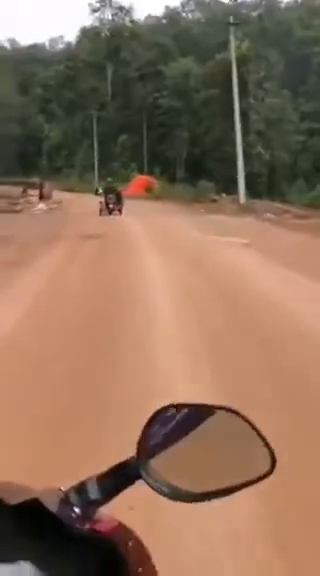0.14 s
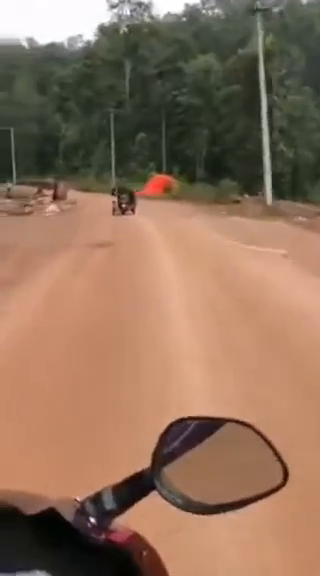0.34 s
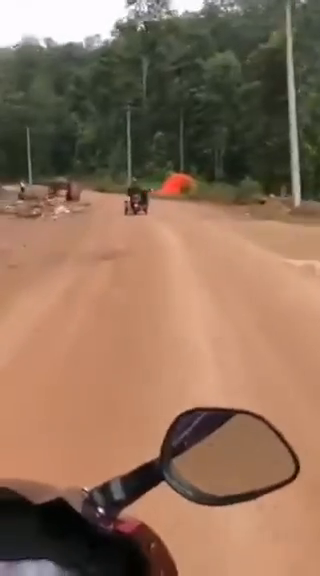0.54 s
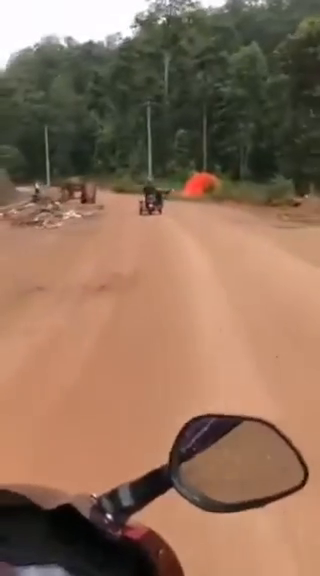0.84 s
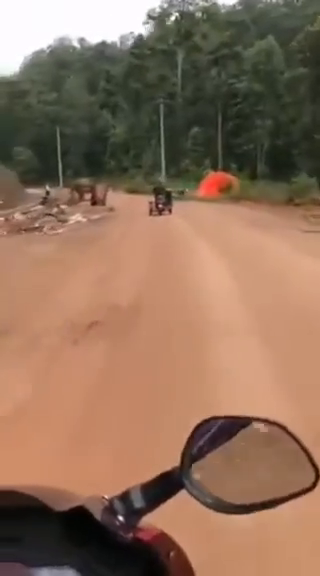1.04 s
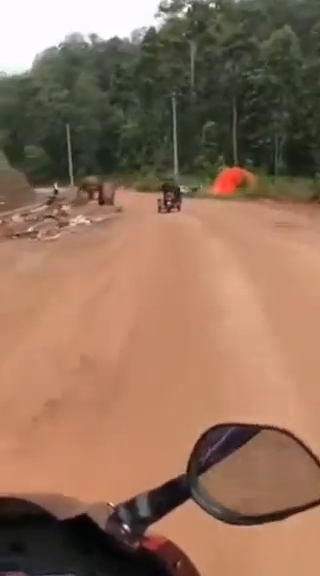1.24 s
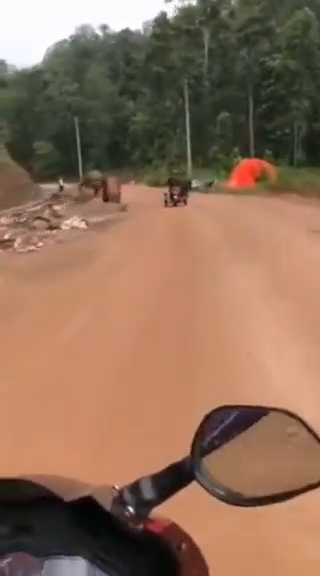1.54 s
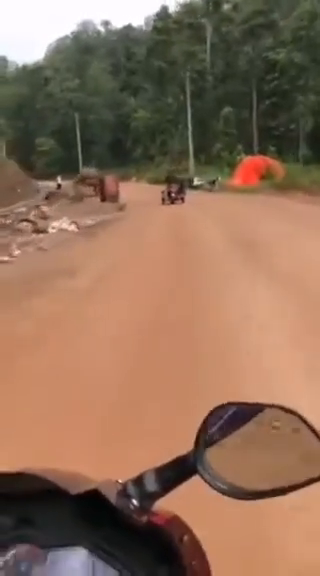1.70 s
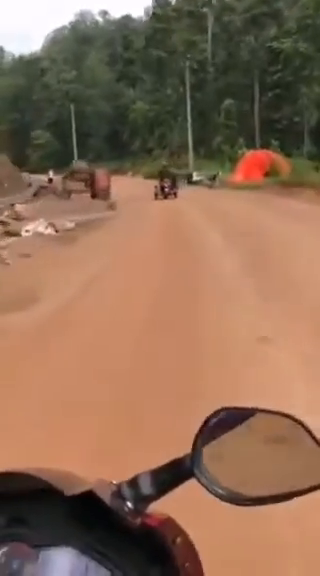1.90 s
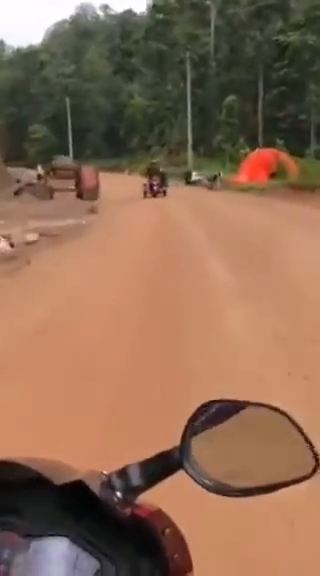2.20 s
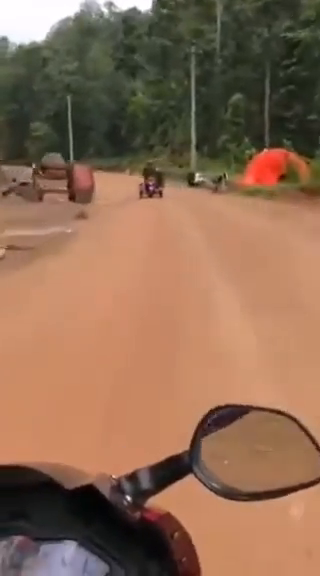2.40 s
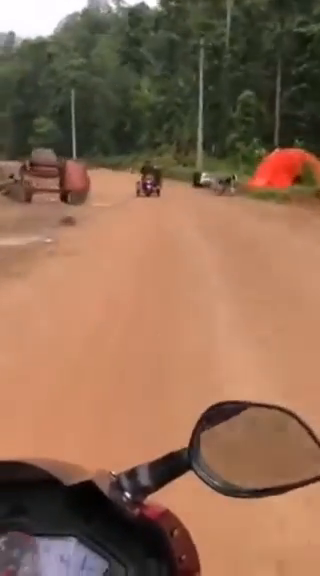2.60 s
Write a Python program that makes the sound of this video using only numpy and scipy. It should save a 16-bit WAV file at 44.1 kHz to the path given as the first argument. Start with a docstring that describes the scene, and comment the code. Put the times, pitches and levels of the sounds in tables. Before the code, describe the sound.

A small single-cylinder motorcycle engine, heard from the seat, pulls with a raspy, clattering putter for the first second. Between about 1.1 and 1.5 seconds it drops to a quieter, slower beat. Tyres hiss on dirt throughout while gusty wind rumbles on the microphone, with dull pops thickest around 1.3 seconds. Faint, thin squeaks come from 1.8 to 2.3 seconds and once more at 2.6.

```python
"""A dirt road, heard from the seat of a small single-cylinder motorcycle.
The engine pulls for a second, then the throttle closes and it drops to a quieter, slower beat;
each firing gives an exhaust puff, a rasp of gas and a clatter of the casing. Tyres hiss on the dirt,
turbulent wind buffets the microphone and single eddies pop on it. Later something squeaks thinly."""
import sys
import numpy as np
from scipy.fft import rfft, irfft, next_fast_len
from scipy.io import wavfile
from scipy.ndimage import map_coordinates

SR = 44100
rng = np.random.default_rng(int(sys.argv[2]) if len(sys.argv) > 2 else 0)


def generate_wav(sig):
    """Save sig (samples, or channels by samples) to the path in sys.argv[1] as 16-bit PCM at SR."""
    pcm = np.round(np.clip(np.atleast_2d(sig).T, -1, 1) * 32767).astype(np.int16)
    wavfile.write(sys.argv[1], SR, pcm)


N = 121275


def amp(db):
    """Decibels to amplitude ratio."""
    return 10 ** (np.asarray(db) / 20)


def unit(x):
    """Scale to rms 1."""
    return x / np.sqrt(np.mean(x ** 2) + 1e-20)


def curve(rows):
    """Linear interpolation of (time [s], value) points, one value per sample."""
    return np.interp(np.arange(N) / SR, *np.transpose(rows))


def wobble(rate):
    """Smooth random fluctuation: a spline through `rate` Gaussian knots a second."""
    return map_coordinates(rng.standard_normal(N // 10), [np.arange(N) * rate / SR], mode="wrap")


def filtered(x, response):
    """Linear filtering: the spectrum of x times a complex frequency response."""
    size = 2 * next_fast_len(N)
    return irfft(rfft(x, size) * response(np.fft.rfftfreq(size, 1 / SR)), size)[:N]


def coloured(x, points):
    """Minimum-phase filtering by (frequency [Hz], gain [dB]) points, scaled to rms 1."""
    def response(hz):
        knots_hz, db = np.transpose(points)
        gain = amp(np.interp(np.log(hz + 1), np.log(knots_hz), db))
        cepstrum = irfft(np.log(gain))
        return np.exp(rfft(2 * cepstrum[:len(cepstrum) // 2], len(cepstrum)))
    return unit(filtered(x, response))


def exhaust(firing_hz, cycle, firing_at, count=75):
    """Fourier series of a pulse train: harmonics of the firing rate sum to one puff a cycle."""
    # response of the pipe (frequency [Hz], relative level [dB])
    pipe = [(20, -21.5), (35, -15), (66, 2), (100, -6.5), (135, -1), (192, -10), (232, 4.5), (275, -5.5),
            (350, -8), (405, 1.5), (450, -3), (500, -2.5), (545, -13), (630, -9), (770, -24), (900, -10),
            (1020, -19), (1150, -5.5), (1300, -18), (1700, -17.5), (3000, -38.5)]
    hz, db = np.transpose(pipe)
    smear_cycles, waver_db = .19, 2.5
    lags = np.cumsum(firing_at + smear_cycles * rng.standard_normal(count))  # dispersion spreads the puff
    out = np.zeros(N)
    for order, lag in enumerate(lags, 1):
        waver = np.interp(cycle, np.arange(count) * 2, rng.standard_normal(count))
        level = np.interp(np.log(order * firing_hz), np.log(hz), db) + waver_db * waver
        out += amp(level) * np.sin(2 * np.pi * (order * cycle - lag))
    return out


def gas_rasp(angle):
    """Amplitude-modulated flow noise: the gas hisses louder for a moment at each firing."""
    # spectrum of the gas noise (frequency [Hz], relative density [dB])
    spectrum = [(100, -40), (400, -1), (800, 3), (1150, 1.5), (1350, -2.5), (1750, -4), (2250, -7.5),
                (2550, -4.5), (4000, -9), (5500, -16.5), (8200, -13), (9500, -41.5)]
    depth_db, sharpness = 2.5, 4
    burst = np.exp(sharpness * (np.cos(angle) - 1))
    return coloured(rng.standard_normal(N) * amp(depth_db * burst), spectrum)


def casing_clatter(angle):
    """Modal resonance: the casing rings under noise that pulses with the crankshaft."""
    # modes of the casing (frequency [Hz], bandwidth [Hz], relative level [dB])
    modes = [(1503, 130, -0.5), (1734, 59, 2), (2042, 37, -1.5), (2980, 220, -10.5), (4760, 170, -17.5),
             (6030, 260, -14.5), (6890, 68, -10), (8420, 135, -11.5)]
    def response(f):
        return sum(amp(db) * 1j * f * width / (hz * hz - f * f + 1j * f * width) for hz, width, db in modes)
    depth_db = 1.5
    pulsing = (np.cos(angle) + np.cos(2 * angle)) / 2
    taps = rng.standard_normal(N) * amp(depth_db * pulsing)
    return unit(filtered(taps, response))


def engine():
    """Periodic excitation: one firing cycle drives three sources; the throttle scales puffs and rasp."""
    # engine speed (time [s], firing rate [Hz])
    speed = [(0, 31.6), (.22, 32.45), (.32, 32.35), (.43, 32.5), (.6, 33.1), (.75, 33.35), (.95, 33.85),
             (1.12, 34), (1.5, 28.2), (1.85, 26.65), (2.1, 26.85), (2.4, 27.25), (2.75, 27.4)]
    # throttle position (time [s], opening [0-1])
    throttle = [(0, 0.7), (.25, 0.83), (1.08, 0.94), (1.2, 0.61), (1.42, 0.03), (1.75, 0.47), (2.3, 0.45),
                (2.75, 0.52)]
    firing_hz, shut = curve(speed), 1 - curve(throttle)
    firing_at = .47  # point of the cycle at which the puff leaves the pipe
    cycle = np.cumsum(firing_hz) / SR
    angle = 2 * np.pi * (cycle - firing_at)
    puffs = amp(-31 - 19 * shut) * exhaust(firing_hz, cycle, firing_at)
    rasp = amp(-29 - 12 * shut) * gas_rasp(angle)
    clatter = amp(-38) * casing_clatter(angle)
    return puffs + rasp + clatter


def tyres():
    """Rolling noise: surface roughness modulates the roar, quickly over grit and slowly over patches."""
    # spectrum of rubber on dirt (frequency [Hz], relative density [dB])
    spectrum = [(25, -42.5), (60, -10.5), (200, 3), (330, 1), (500, 6), (800, -4), (1150, -2),
                (1320, -13.5), (1900, -6.5), (2400, -10.5), (3200, -16), (5500, -16), (8500, -27),
                (9500, -40)]
    grit_db, patch_db = 2.5, 1.2
    roughness = amp(grit_db * wobble(rate=300) + patch_db * wobble(rate=12))
    return amp(-32) * coloured(rng.standard_normal(N) * roughness, spectrum)


def wind():
    """Turbulent pressure fluctuation at the microphone: a low, fluttering rumble that swells in gusts."""
    # gust envelope (time [s], level [dB])
    gusts = [(0, -21.5), (.05, -33), (.105, -25), (.17, -26.5), (.23, -26), (.3, -24), (.47, -26),
             (.58, -28.5), (.68, -22.5), (.79, -35), (.88, -23.5), (1.02, -27), (1.16, -29), (1.28, -24.5),
             (1.37, -28), (1.425, -20), (1.46, -31.5), (1.54, -33), (1.585, -23), (1.63, -35),
             (1.74, -27.5), (1.785, -22), (1.87, -26), (1.945, -26), (1.985, -30), (2.07, -30), (2.19, -21),
             (2.31, -25), (2.42, -28.5), (2.48, -22), (2.56, -21.5), (2.61, -27.5), (2.75, -26)]
    # spectrum of the buffeting (frequency [Hz], relative density [dB])
    spectrum = [(20, -36), (35, -9.5), (60, 7.5), (110, 4), (180, 3.5), (300, -3.5), (550, -10.5),
                (900, -13.5), (1500, -40.5), (4000, -52.5)]
    gain_db, flutter_db, crest = 1.5, 1.5, 2.4
    flow = rng.standard_normal(N) * amp(flutter_db * wobble(rate=90))
    buffeting = np.tanh(coloured(flow, spectrum) / crest)  # peaks level off softly
    return amp(gain_db + curve(gusts)) * unit(buffeting)


def eddies():
    """Vortex pressure pulses: each is a dull swing of a few ever longer cycles, roughened by its wake."""
    # eddies striking the microphone (time [s], envelope peak [dB], centre pitch [Hz])
    strikes = [(.103, -13, 300), (.108, -12.5, 95), (.461, -15, 380), (.47, -14, 650), (.482, -11.5, 620),
               (.486, -14, 250), (.603, -16, 440), (.668, -12.5, 230), (.682, -15, 200), (.713, -9.5, 400),
               (.738, -16, 100), (1.23, -15, 230), (1.248, -12, 700), (1.257, -17, 140), (1.309, -9, 1200),
               (1.3135, -8, 420), (1.316, -10.5, 170), (1.324, -17, 520), (1.338, -13, 85),
               (1.352, -15, 350), (1.366, -9.5, 550), (1.375, -11.5, 130), (1.392, -17, 100),
               (1.428, -8.5, 225), (1.434, -16, 105), (1.686, -14, 740), (1.775, -18, 330),
               (1.791, -15, 175), (1.916, -17, 140), (1.938, -17, 105), (1.956, -14, 900), (1.96, -10, 230),
               (2.024, -20, 147), (2.199, -14, 620), (2.207, -12, 200), (2.224, -7.5, 950),
               (2.2265, -7, 420), (2.241, -16, 850), (2.266, -17, 130), (2.477, -15.5, 190),
               (2.546, -15, 180)]
    width_cycles, fall = .75, .48  # fall: drop in log pitch per cycle
    wake_db, ripples_per_cycle, port_hz = -10.5, 5, 1550
    t, out = np.arange(N) / SR, np.zeros(N)
    for centre, db, hz in strikes:
        stretch = np.maximum(1 + fall * hz * (t - centre), 1e-9)
        turns = np.log(stretch) / fall
        swing = np.sin(2 * np.pi * (turns + rng.random()))
        wake = amp(wake_db) * wobble(ripples_per_cycle * hz)
        envelope = amp(db) * np.exp(-.5 * (turns / width_cycles) ** 2)
        out += envelope * (swing + wake)
    # faster pressure swings average out across the microphone port
    return filtered(out, lambda hz: 1 / np.sqrt(1 + (hz / port_hz) ** 20))


def squeals():
    """Random pitch and level modulation roughens thin tones as the bike coasts, perhaps a rubbing brake."""
    # one contour per squeal (time [s], pitch [Hz], level [dB])
    contours = [
        [(1.79, 4400, -62), (1.82, 4270, -45), (1.885, 4080, -44), (1.93, 4060, -54), (2.008, 4080, -39.5),
         (2.028, 4300, -46), (2.06, 4120, -57), (2.11, 4120, -43), (2.15, 4110, -39.5), (2.21, 4040, -48),
         (2.23, 4120, -40), (2.28, 4200, -58)],
        [(2.575, 3150, -49), (2.603, 3200, -37), (2.625, 3250, -49)],
    ]
    scatter_hz, scatter_db = 55, 3
    t, out = np.arange(N) / SR, np.zeros(N)
    for rows in contours:
        times, hz, db = np.transpose(rows)
        pitch = np.interp(t, times, hz) + scatter_hz * wobble(rate=300)
        level = np.interp(t, times, db, left=-np.inf, right=-np.inf) + scatter_db * wobble(rate=300)
        out += amp(level) * np.sin(2 * np.pi * np.cumsum(pitch) / SR)
    return out


def scene():
    """Superposition: all sources add at one microphone in open air."""
    return (engine() + tyres() + wind() + eddies() + squeals())[None]


def record(dry):
    """Band limiting: a steep low-pass removes the highest treble."""
    cutoff_hz = 9170
    low_pass = lambda hz: 1 / np.sqrt(1 + (hz / cutoff_hz) ** 220)
    return np.array([filtered(channel, low_pass) for channel in dry])


dry = scene()
out = record(dry)
generate_wav(out)
```